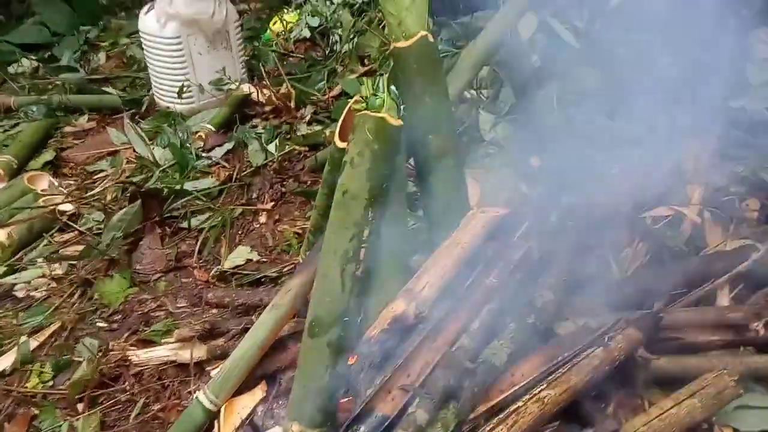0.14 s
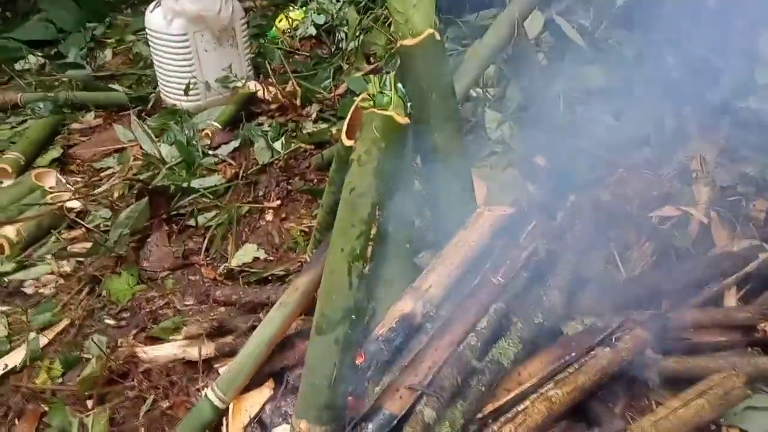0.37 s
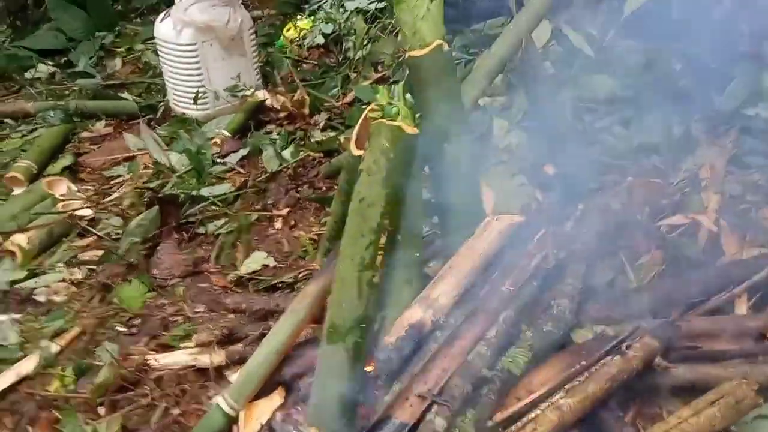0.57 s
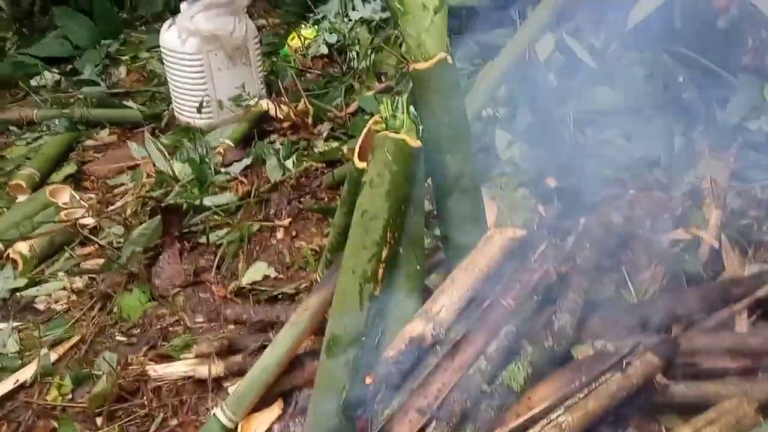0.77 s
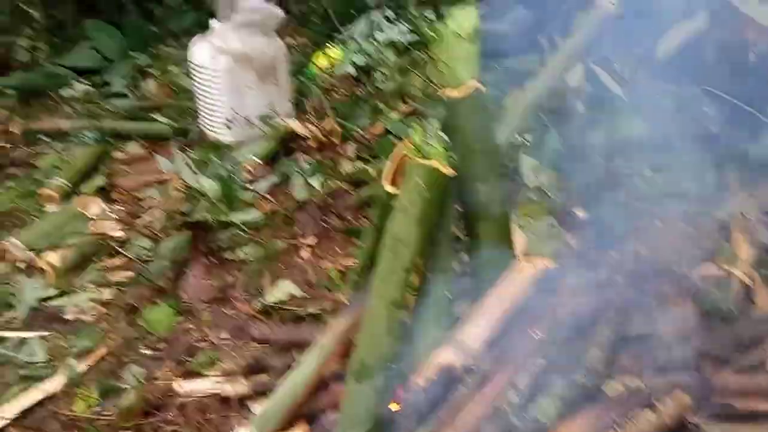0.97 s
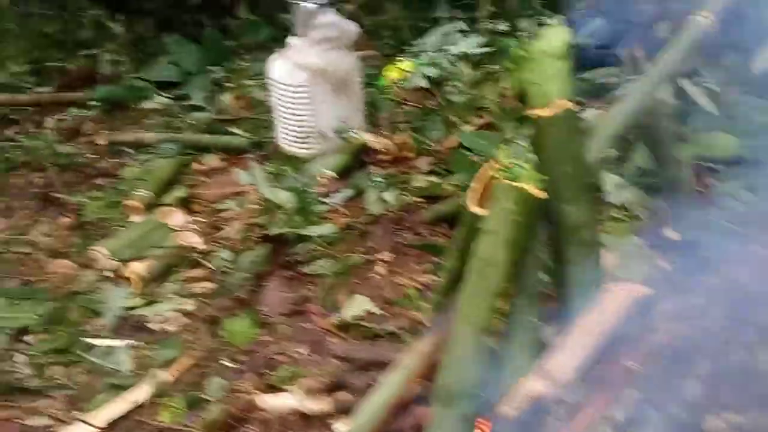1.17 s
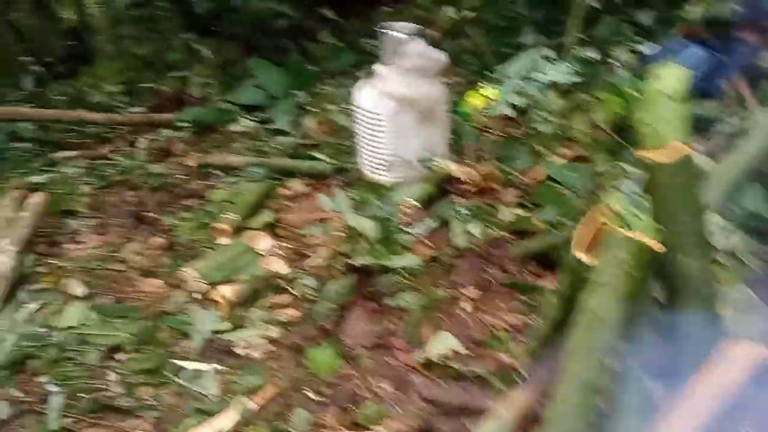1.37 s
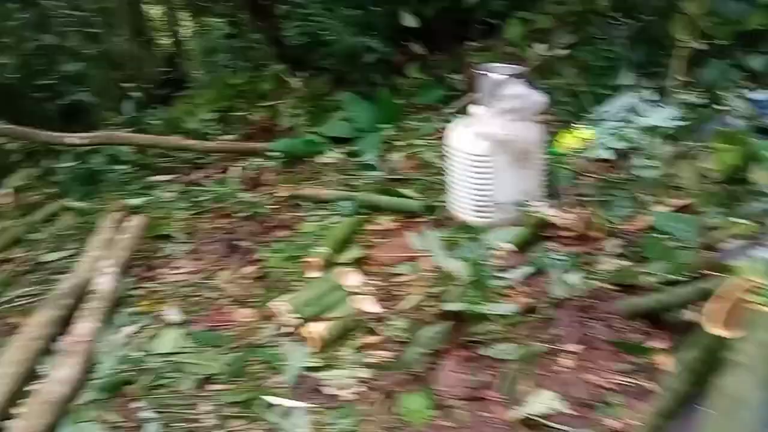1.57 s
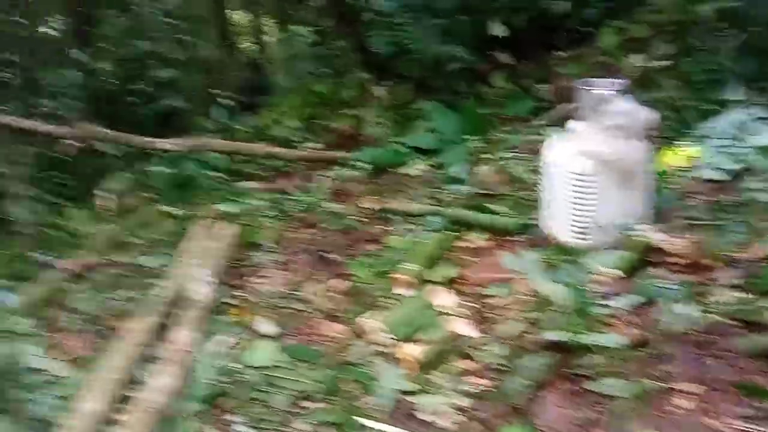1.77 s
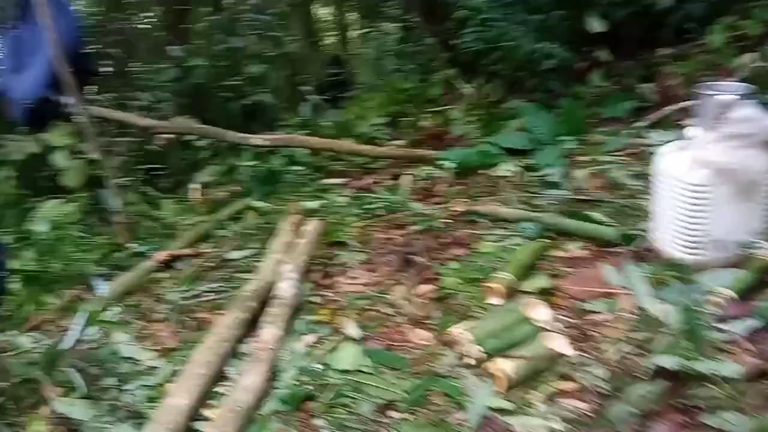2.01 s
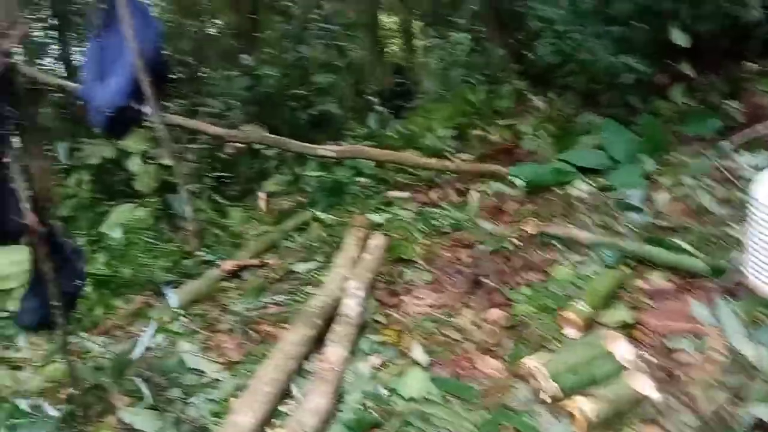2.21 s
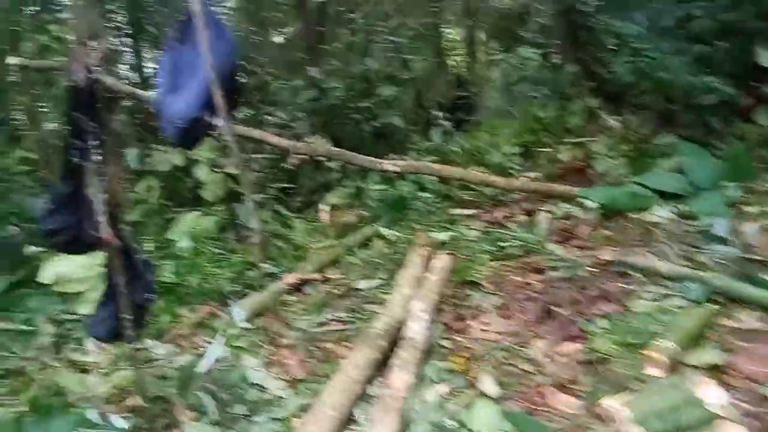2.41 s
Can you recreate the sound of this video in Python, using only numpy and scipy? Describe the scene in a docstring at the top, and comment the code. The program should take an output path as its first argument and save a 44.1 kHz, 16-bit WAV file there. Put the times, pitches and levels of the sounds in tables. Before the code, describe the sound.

A fire of wood and green bamboo burns a few steps away in a forest. Two loud pops come a second apart with a short echo, then quicker snaps and crackles follow over softly hissing sap.

```python
"""In a forest, a wood fire burns with green bamboo in it. Two canes burst with loud pops: quick
fractures excite the damped modes of each tube, and the trees answer with a decaying echo.
Between them boiling sap hisses and steam escapes in puffs, both as shaped noise over a low rumble;
embers tick, fibres snap, wood knocks and thuds dully, and low booms roll back."""
import sys
import numpy as np
from scipy import signal
from scipy.fft import rfft, irfft, next_fast_len
from scipy.io import wavfile
from scipy.ndimage import uniform_filter1d

SR = 44100
rng = np.random.default_rng(int(sys.argv[2]) if len(sys.argv) > 2 else 0)


def wav_out(sig):
    """Save sig, one row per channel (or a flat mono array), as 16-bit PCM at SR to the path in sys.argv[1]."""
    wavfile.write(sys.argv[1], SR, np.round(np.clip(np.atleast_2d(sig).T, -1, 1) * 32767).astype(np.int16))


N = 108045
T = np.arange(N) / SR


def amp(db):
    """Amplitude ratio of a level in decibels."""
    return 10 ** (np.asarray(db) / 20)


def unit(x):
    """Normalisation to rms 1."""
    return x / np.sqrt(np.mean(x ** 2) + 1e-20)


def along(points, hz):
    """Interpolation of (f/Hz, value) points on a logarithmic frequency axis."""
    f, values = np.transpose(points)
    return np.interp(np.log(hz + 1), np.log(f + 1), values)


def level(points):
    """Amplitude envelope through (t/s, level/dB) points."""
    return amp(np.interp(T, *np.transpose(points)))


def filtered(x, response):
    """Linear filtering: the spectrum of x is multiplied by a frequency response."""
    size = next_fast_len(N + SR // 4)
    return irfft(rfft(x, size) * response(np.fft.rfftfreq(size, 1 / SR)), size)[:N]


def coloured(x, spectrum):
    """Spectral shaping of x by (f/Hz, level/dB) points, at rms 1."""
    return unit(filtered(x, lambda hz: amp(along(spectrum, hz))))


def band(centre_hz, octaves, grain=1):
    """Noise of rms 1 in a Gaussian band on log frequency; grain modulates it before filtering."""
    noise = grain * rng.standard_normal(N)
    return unit(filtered(noise, lambda hz: np.exp(-.5 * (np.log2((hz + 1) / centre_hz) / octaves) ** 2)))


def strike(onset, t60, rise_s=0.00045):
    """Envelope of an impulsive excitation: a quick rise, then exponential decay by 60 dB in t60."""
    age = np.maximum(T - onset, 0)
    return (1 - np.exp(-age / rise_s)) * np.exp(-np.log(1000) * age / t60)


def ringing(modes, onset):
    """Free vibration of a struck body: a superposition of damped sinusoidal modes."""
    return sum(amp(db) * strike(onset, t60) * np.sin(2 * np.pi * hz * (T - onset))
               for hz, db, t60 in modes)


def forest(noise, onset, rise_s=0.01):
    """Reverberation among trees: noise builds up, then decays at a rate that depends on frequency."""
    # reverberation time of the forest: f/Hz, t60/s
    decay_times = [(100, 0.54), (420, 0.46), (900, 0.3), (1400, 0.52), (2500, .52), (4000, 0.63),
                   (8000, 0.67), (15000, 0.6)]
    hz, t, spectra = signal.stft(noise, SR, nperseg=256)
    decay = np.exp(-np.log(1000) * np.maximum(t - onset, 0) / along(decay_times, hz)[:, None])
    build_up = 1 - np.exp(-np.maximum(T - onset, 0) / rise_s)
    return signal.istft(spectra * decay, SR, nperseg=256)[1][:N] * build_up


def forest_echo(direct, echo_db):
    """Convolution of a direct sound with the forest's impulse response, taken at unit energy."""
    response = forest(rng.standard_normal(N), onset=0)
    return amp(echo_db) * signal.fftconvolve(direct, response / np.linalg.norm(response))[:N]


def fire_rush():
    """Amplitude-modulated noise: a soft rush, a frying hiss and a low rumble each swell and fade."""
    # envelopes of the three bands: t/s, level/dB
    rush_level = [(0, -70.5), (.3, -93), (1.1, -78.5), (1.6, -60), (1.85, -59), (2.0, -61), (2.15, -62.5),
                  (2.3, -67), (2.45, -106)]
    fry_level = [(0, -76), (.1, -61.5), (.5, -71), (.63, -70), (.8, -69.5), (.92, -87), (1.07, -85.5),
                 (1.35, -59.5), (1.6, -60), (2.05, -58), (2.3, -62.5), (2.45, -64.5)]
    rumble_level = [(0, -80), (.5, -83), (.62, -68.5), (.9, -76.5), (1.02, -75), (1.45, -82), (1.55, -67),
                    (1.83, -75.5), (2.13, -60.5), (2.19, -66), (2.31, -64), (2.45, -100)]
    # spectrum of the rumble: f/Hz, level/dB
    rumble_spectrum = [(25, -61), (50, -1), (85, 6), (150, 0.5), (260, -6.5), (500, -26), (900, -21)]
    rush = level(rush_level) * band(centre_hz=1025, octaves=0.88)
    fry = level(fry_level) * band(centre_hz=2690, octaves=0.52)
    rumble = level(rumble_level) * coloured(rng.standard_normal(N), rumble_spectrum)
    return rush + fry + rumble


def sap():
    """Boiling sap: noise modulated at random in time and frequency, plus a Poisson train of ticks."""
    # envelope of the hiss: t/s, level/dB
    hiss_level = [(0, -57.5), (.1, -55.5), (.4, -55.5), (.52, -63), (.65, -57.5), (.85, -58.5),
                  (1.05, -63.5), (1.3, -56.5), (1.45, -53.5), (1.6, -52), (1.9, -50.5), (2.1, -52),
                  (2.22, -53.5), (2.36, -57), (2.45, -56)]
    # spectrum of hiss and ticks: f/Hz, level/dB
    hiss_spectrum = [(150, -27), (280, -7), (480, -6), (700, -17.5), (950, -18.5), (1250, -2), (1680, 0),
                     (1950, -3), (2700, -12.5), (3300, -4), (3800, -0.5), (6300, -1), (8000, -6.5),
                     (9700, -6.5), (11500, -18), (13500, -21), (15000, -11), (16000, -2)]
    patchy_db, flutter_db = 3.5, 1.1
    ticks_per_s, tick_spread_db, tick_db = 200, -4, -12.5
    spectra = signal.stft(rng.standard_normal(N), nperseg=512)[2]
    patches = uniform_filter1d(rng.standard_normal(spectra.shape), size=4, axis=0)  # across frequency
    patches = unit(uniform_filter1d(patches, size=18, axis=1))  # across time
    flutter = unit(uniform_filter1d(rng.standard_normal(spectra.shape[1]), size=4))
    hiss = signal.istft(spectra * amp(patchy_db * patches + flutter_db * flutter), nperseg=512)[1][:N]
    sizes = amp(tick_spread_db * np.minimum(rng.exponential(size=N), 4)) * rng.choice([-1, 1], N)
    ticks = (rng.random(N) < ticks_per_s / SR) * sizes
    return level(hiss_level) * coloured(unit(hiss) + amp(tick_db) * unit(ticks), hiss_spectrum)


def steam(sputter_db=2.5):
    """Flow noise of escaping steam: puffs sputter, swell and fade; narrow bands whistle faintly."""
    # puffs: peak t/s, level/dB, rise/s, fall/s, centre f/Hz, width/octaves
    puffs = [(0.71, -55.5, 0.024, 0.052, 2400, 1.74), (0.707, -59, .03, .035, 15800, 0.074),
             (0.722, -60.5, .045, 0.031, 458, 0.065), (1.7915, -42, 0.038, 0.03, 2450, 0.96),
             (1.77, -50, 0.042, 0.051, 6200, 0.21)]
    out = np.zeros(N)
    for peak, db, rise, fall, hz, octaves in puffs:
        sputter = amp(sputter_db * unit(uniform_filter1d(rng.standard_normal(N), size=60)))
        swell = np.exp(-.5 * ((T - peak) / np.where(T < peak, rise, fall)) ** 2)
        out += amp(db) * swell * band(hz, octaves, sputter)
    return out


def booms():
    """Low-frequency reverberation: a boom of decaying noise rolls back after the heavy sounds."""
    # arrivals of the booms: t/s, level/dB
    arrivals = [(0.143, -53), (1.125, -49), (1.597, -48.5), (1.937, -48), (2.21, -51.5)]
    # spectrum of a boom: f/Hz, level/dB
    spectrum = [(25, -31), (48, -17), (72, 6), (90, -5.5), (130, -8), (220, -16.5), (450, -75)]
    envelope = sum(amp(db) * strike(onset, t60=.5, rise_s=.015) for onset, db in arrivals)
    return envelope * coloured(rng.standard_normal(N), spectrum)


def thuds():
    """Impact excitation: a log meets the ground with a dull noise burst and rings in its low modes."""
    # impacts: t/s, level/dB, relative ring level/dB, centre f/Hz, t60/s
    impacts = [(.712, -52.5, -1.5, 376, 0.2), (1.599, -50.5, 4, 246, 0.22), (1.931, -48.5, 3, 350, 0.27),
               (1.948, -47.5, -5.5, 192, 0.1), (2.2035, -42.5, 4, 300, 0.2)]
    # modes of a log: f/Hz, level/dB, t60/s
    log_modes = [(126, -19, 0.077), (206, -2.5, 0.14), (280, 0, .12), (430.4, -0.5, 0.074),
                 (530, -9, 0.094)]
    out = np.zeros(N)
    for onset, db, ring_db, hz, t60 in impacts:
        contact = strike(onset, t60, rise_s=0.00067) * band(hz, octaves=0.69)
        out += amp(db) * (contact + amp(ring_db) * ringing(log_modes, onset))
    return out


def knocks(roughness=.35):
    """Damped resonance of knocked wood: one mode each, roughened by narrow-band noise."""
    # knocks: t/s, level/dB, f/Hz, t60/s
    impacts = [(1.3935, -39.5, 670, 0.072), (1.5911, -34.5, 1040, 0.05), (1.5915, -38, 1630, 0.041),
               (1.9281, -33.5, 1890, 0.038), (1.9285, -33.5, 3490, 0.028), (2.189, -36.5, 1265, 0.019)]
    out = np.zeros(N)
    for onset, db, hz, t60 in impacts:
        tone = np.sin(2 * np.pi * hz * (T - onset)) + roughness * band(hz, octaves=0.16)
        out += amp(db) * strike(onset, t60, rise_s=.001) * tone
    return out


def crackles():
    """Transients of the embers: short bursts of band noise with exponential decay."""
    # bursts: t/s, level/dB, centre f/Hz, width/octaves, t60/s
    bursts = [(.5872, -62, 5000, 0.83, 0.022), (.603, -53, 9000, 0.79, .015), (0.6977, -50, 2100, .3, .04),
              (.9385, -53, 6000, 0.58, 0.04), (0.977, -61, 12100, 0.99, .02),
              (1.2764, -35.5, 5900, 0.33, 0.0097), (1.397, -47, 1490, 0.72, 0.19),
              (1.546, -39.5, 4210, 1.4, 0.018), (1.5903, -44.5, 1780, 1.14, 0.18),
              (1.718, -44, 1580, 0.66, 0.073), (1.861, -36, 2580, 0.78, 0.013),
              (1.871, -45, 3260, .9, 0.03), (1.918, -47, 1580, 1.4, 0.1), (1.93, -43.5, 1480, 0.58, 0.16),
              (2.093, -45.5, 6000, 2.2, 0.025), (2.1355, -45, 3520, 0.28, 0.04),
              (2.148, -43, 6500, 0.75, 0.024), (2.153, -36.5, 4000, 0.93, 0.021),
              (2.159, -40, 6440, .9, 0.019), (2.234, -34, 3500, 0.57, 0.0071),
              (2.2345, -44, 1400, 0.9, 0.09), (2.4005, -50, 2520, 1.3, 0.13)]
    return sum(amp(db) * strike(onset, t60) * band(hz, octaves) for onset, db, hz, octaves, t60 in bursts)


def snaps(t60_cycles=3.1):
    """Heavily damped oscillation: fibres parting at once give one sharp swing of pressure each."""
    # snaps close by: t/s, level/dB, f/Hz
    breaks = [(1.547, -34, 4000), (1.5917, -24.5, 1380), (1.718, -38, 1500), (1.9286, -22, 1990),
              (2.234, -18, 2820), (2.4004, -41, 2640)]
    out = np.zeros(N)
    for onset, db, hz in breaks:
        envelope = strike(onset, t60_cycles / hz, rise_s=.00002)
        out += amp(db) * envelope * np.sin(2 * np.pi * hz * (T - onset))
    return out


def pop(fractures, modes, echo_spectrum, echo_db):
    """Impulsive excitation of a tube: fractures tear fibres and ring the cane; the trees answer."""
    # spectrum of tearing fibres: f/Hz, level/dB
    tear_spectrum = [(100, -33), (400, -35), (800, -10), (1700, -9), (2800, 2.5), (3900, -3), (4500, -20.5),
                     (6200, -3.5), (7300, -13), (8600, -12.5), (12500, -28.5), (15500, -22)]
    direct = np.zeros(N)
    for onset, db, ring_db, crack_t60 in fractures:
        crack = strike(onset, crack_t60) * coloured(rng.standard_normal(N), tear_spectrum)
        direct += amp(db) * (crack + amp(ring_db) * ringing(modes, onset))
    echo = forest(coloured(rng.standard_normal(N), echo_spectrum), onset=fractures[1][0])
    return direct + amp(echo_db) * echo


def canes():
    """Two bamboo canes burst about a second apart, each ringing at its own natural frequencies."""
    # fractures of each cane: t/s, level/dB, relative ring level/dB, crack t60/s
    first_split = [(.1178, -24, -9, 0.06), (.1212, -19, -0.5, 0.0076), (.1238, -21, -14, 0.027),
                   (.1267, -20.5, -3, 0.057)]
    second_split = [(1.0895, -48, 10, .005), (1.0924, -29, -4, .01), (1.0934, -22.5, -16, 0.034),
                    (1.0944, -18.5, 1.5, 0.007), (1.0978, -21, -5.5, 0.012)]
    # modes of each tube: f/Hz, level/dB, t60/s
    first_modes = [(920, -25, .03), (1875, -10, 0.055), (2137, -5, 0.038), (2701, 4, 0.037),
                   (3100, -19, 0.017), (3540, -1.5, 0.029), (3730, 2, 0.038), (4130, -5, .02),
                   (5000, -2, 0.033), (5600, -1, .016), (6360, -14, 0.019), (8460, -8, 0.038)]
    second_modes = [(281.7, -26, 0.21), (623, -21, 0.065), (756, -12.5, 0.069), (928, -13.5, .035),
                    (1170, -11, 0.034), (1497, -7, 0.03), (2520, 1, 0.013), (2930, 3, 0.013),
                    (3700, -3.5, 0.057), (4470, -14, 0.034), (6500, -7.5, 0.016)]
    # spectrum of the forest's echo of each cane: f/Hz, level/dB
    first_echo = [(40, -28), (120, -12), (350, -9), (560, -8), (820, -3), (1050, -3), (1500, -5.5),
                  (2350, -2.5), (2730, 0.5), (3150, -3.5), (4050, 2), (4500, -2.5), (5200, -4.5),
                  (6400, -7.5), (8000, -14.5), (10500, -18.5), (13300, -31), (15400, -16)]
    second_echo = [(40, -15), (100, -8), (280, -7), (420, -10), (750, 3), (1050, -1.5), (1450, 3.5),
                   (1850, -0.5), (3300, -2.5), (3720, 1.5), (4200, -5.5), (4800, -7), (6500, -6),
                   (8000, -11), (10500, -16.5), (13300, -24), (15400, -12.5)]
    first = pop(first_split, first_modes, first_echo, echo_db=-32)
    second = pop(second_split, second_modes, second_echo, echo_db=-32.5)
    return first + second


def scene():
    """Linear superposition of all the fire's sources, heard from a few steps away."""
    pops = canes()
    embers = crackles()
    wood = snaps() + knocks() + embers + forest_echo(embers, echo_db=-8) + booms() + thuds()
    background = steam() + sap() + fire_rush()
    return (pops + wood + background)[None]


def record(dry):
    """Band limiting: a high-pass filter thins the deep bass, and a sharp cut-off ends the treble."""
    low_cut_hz, top_hz = 66, 15850
    high_pass = signal.butter(2, low_cut_hz, 'highpass', fs=SR, output='sos')
    thinned = signal.sosfilt(high_pass, dry[0])
    return filtered(thinned, lambda hz: hz < top_hz)[None]


dry = scene()
out = record(dry)
wav_out(out)
```